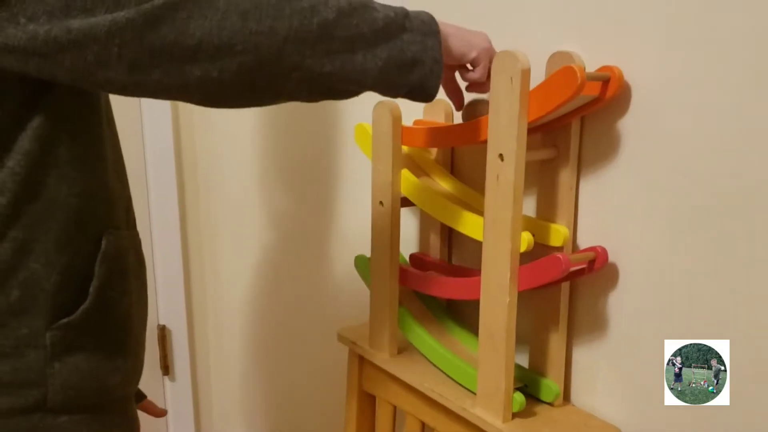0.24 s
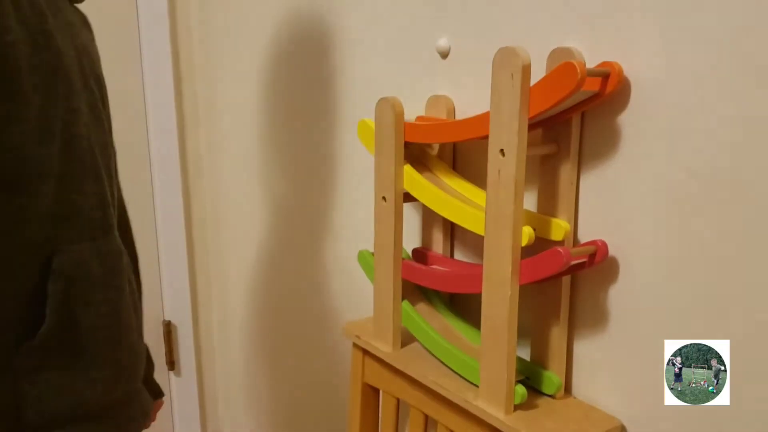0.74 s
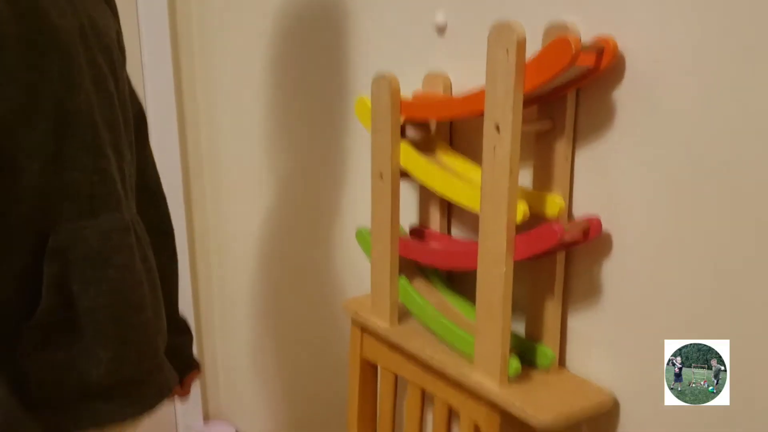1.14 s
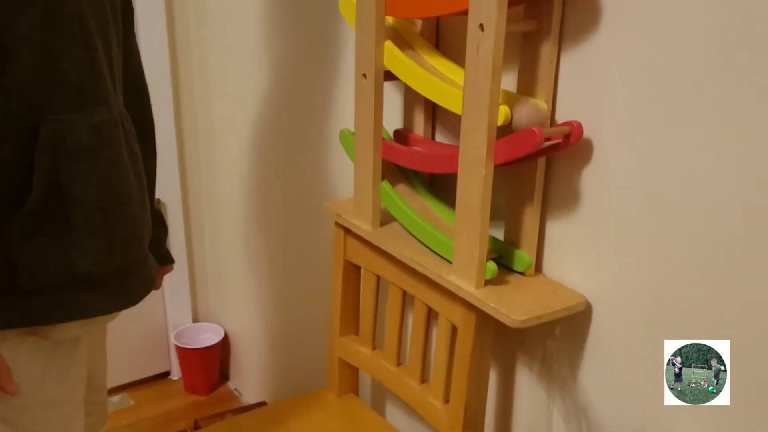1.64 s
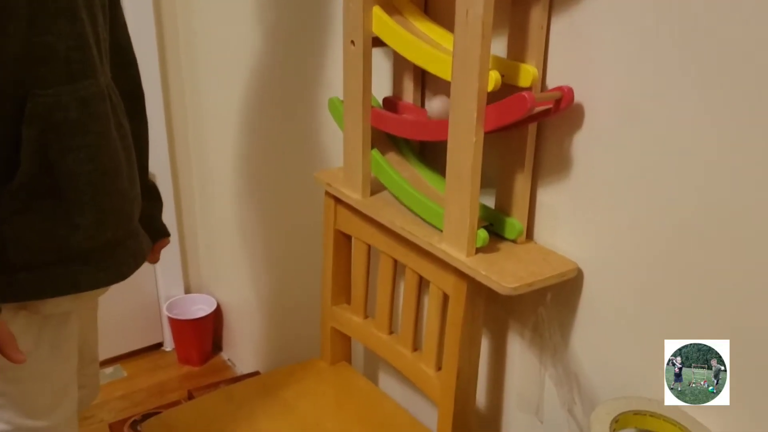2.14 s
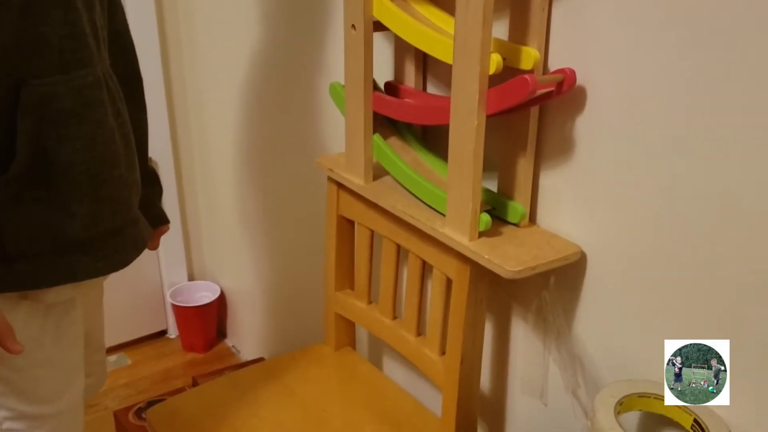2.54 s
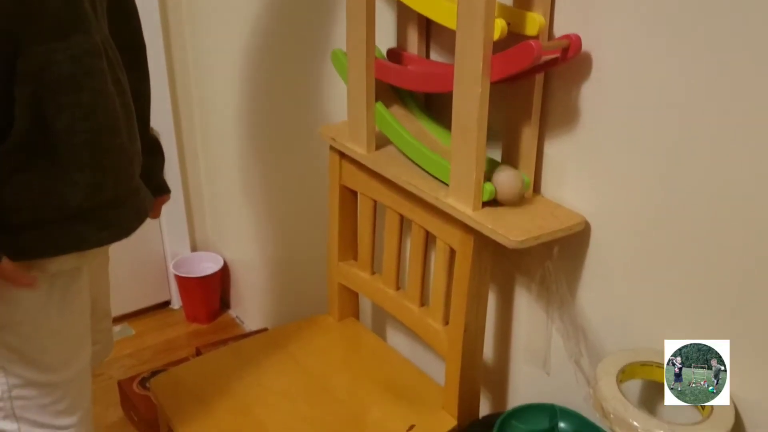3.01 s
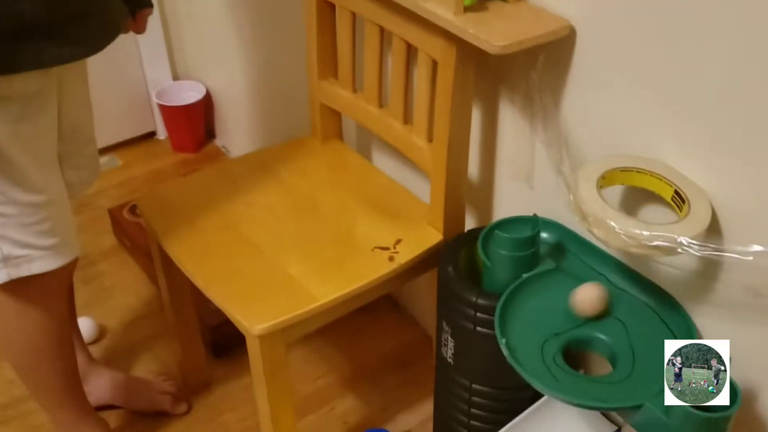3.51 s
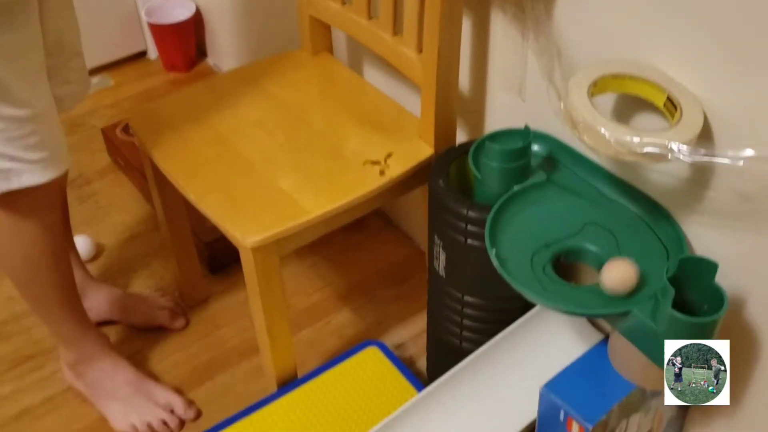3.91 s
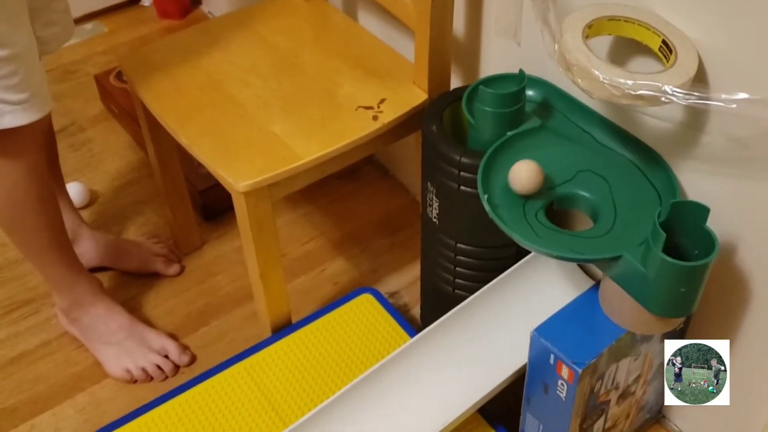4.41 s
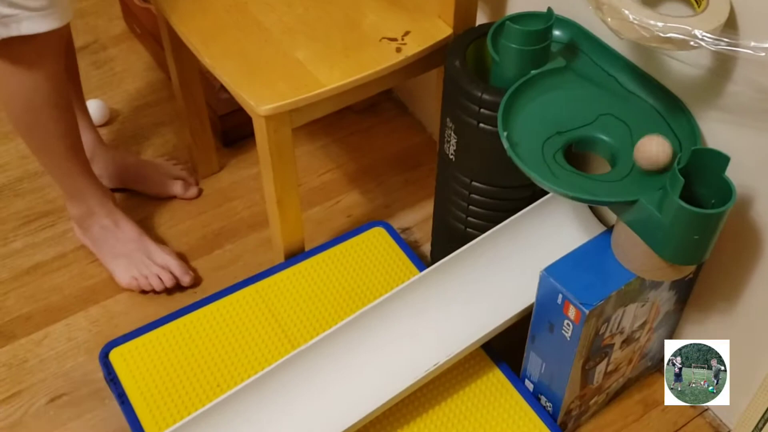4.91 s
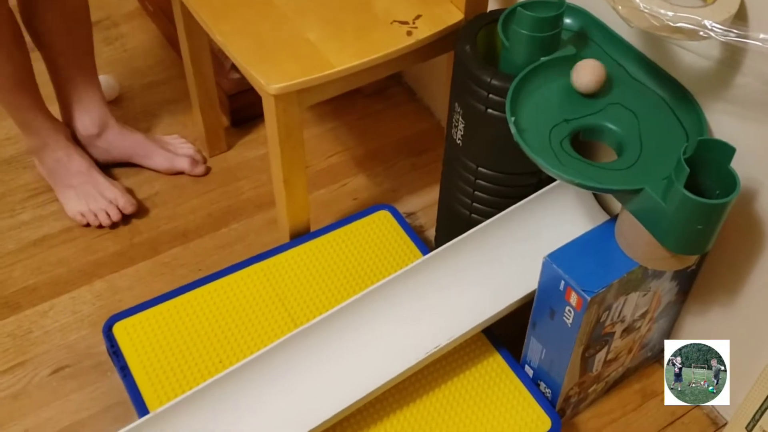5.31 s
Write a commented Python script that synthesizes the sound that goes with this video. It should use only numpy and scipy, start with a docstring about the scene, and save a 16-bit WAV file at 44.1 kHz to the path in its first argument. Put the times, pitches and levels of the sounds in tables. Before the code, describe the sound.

A wooden ball clatters down a wooden ramp toy, then lands in a plastic funnel and circles with a hollow, fading rumble.

```python
"""A wooden ball is set on a wooden zigzag ramp toy in a small, quiet room. It drops down four ramps,
bouncing and rattling on each; on all but the second it then rolls smoothly and gathers speed. Each knock
rings the ramp and the frame. At about 3 s it hits the end stop, glances off a roll of tape and lands in a
plastic marble-run funnel. There it circles with a hollow, fading rumble that swells at each pass near
the hole. Just before 5 s something soft brushes faintly in the room."""
import sys
import numpy as np
from scipy import signal
from scipy.fft import rfft, irfft
from scipy.io import wavfile

SR = 44100
rng = np.random.default_rng(int(sys.argv[2]) if len(sys.argv) > 2 else 0)


def to_wav(sig):
    """Store sig (one row per channel, or 1-D mono) as 16-bit WAV at the path in sys.argv[1].

    Samples outside -1..1 are clipped; the rate is SR.
    """
    pcm = np.clip(np.atleast_2d(sig), -1, 1) * 32767
    pcm = np.round(pcm).astype(np.int16)
    wavfile.write(sys.argv[1], SR, pcm.T)  # frames by channels


N = 245131
TIME = np.arange(N) / SR
RING_SAMPLES = 22050
AGE = np.arange(RING_SAMPLES) / SR  # seconds since an impact
FILTER_HZ, SCENE_HZ = np.fft.rfftfreq(2 * RING_SAMPLES, 1 / SR), np.fft.rfftfreq(N, 1 / SR)

# low modes of the toy's upright frame and the funnel's dish: pitch_hz, level_db, t60_s
FRAME_MODES = [(102, -5.5, 0.17), (140.9, 0.5, 0.28), (245.5, 1.5, .25), (267.1, -9.5, 0.34),
               (330.6, -6.5, 0.26), (540, 1.5, 0.18)]
DISH_MODES = [(205.5, 7.5, 0.11), (215.3, -5, 0.41), (282, -8.5, 0.15), (305, -9, 0.27), (371.4, 6, 0.15),
              (403.6, -5, 0.094), (526, -2, 0.16)]
# decay of toy and room together: frequency_hz, t60_s
DECAY = [(100, 0.35), (260, 0.29), (700, 0.28), (1840, 0.26), (4850, 0.26), (12800, 0.24)]
# likeness of left and right: frequency_hz, correlation
STEREO_LIKENESS = [(130, 0.93), (260, 0.98), (520, 0.69), (1000, 0.32), (4000, 0.033), (12000, 0.44)]


def struck_parts():
    """The parts that the ball strikes on its way down, each with a dull body and a clear ring."""
    # dense, quickly dying vibration: frequency_hz, level_db
    ramp1_body = [(29, -48), (50, -25.5), (135, -8), (198, -27), (246, 1.5), (461, -19.5), (532, -6),
                  (802, -17.5), (1070, -4), (1300, -7.5), (2440, -7.5), (2880, -11), (16000, -35)]
    ramp2_body = [(29, -20.5), (50, -13), (138, -3), (189, -8), (258, -5), (291, -9), (520, -4.5),
                  (615, -10), (950, -1), (1300, -6.5), (2440, 0.5), (2950, -4.5), (3500, -2.5), (5670, -14),
                  (16000, -32.5)]
    ramp3_body = [(29, -38), (50, -16), (101, 3.5), (180, -11), (240, -1.5), (321, -4), (389, -12),
                  (532, -3.5), (601, -9), (1100, -1), (1620, -3.5), (2110, -0.5), (2320, -1), (2810, 0.5),
                  (16000, -25.5)]
    ramp4_body = [(29, -50.5), (50, -17), (138, -10), (189, -12), (246, -14.5), (461, -11.5), (545, -12.5),
                  (615, -14), (927, -0.5), (2210, -13), (3180, -9), (3670, -15), (7390, -25), (8750, -28),
                  (16000, -42.5)]
    stop_body = [(29, -56), (50, -25), (141, -11), (184, -24.5), (252, -15), (291, -15.5), (398, -6),
                 (586, -26.5), (822, -8.5), (1540, -9.5), (2320, -2.5), (2750, -14.5), (4040, -14.5),
                 (4560, -23.5), (16000, -59.5)]
    tape_body = [(29, -75), (50, -29.5), (119, 2), (171, -6), (218, -35), (291, -17), (520, -10),
                 (997, -23), (2880, -35), (6870, -44.5), (16000, -50)]
    funnel_body = [(29, -23), (50, -13), (87, -3.5), (141, -10), (193, -13), (321, -4), (418, 4),
                   (495, -14.5), (601, -4), (1700, -6), (3580, -14), (6710, -18.5), (16000, -31.5)]
    # clear modes: pitch_hz, level_db, t60_s
    ramp1_modes = [(1020, 5, 0.22), (1420, 3, 0.088), (1814, 4, 0.3), (2400, -10.5, 0.068),
                   (3500, -22, 0.26)]
    ramp2_modes = [(955, -3.5, 0.37), (1675, -5.5, 0.54), (2000, -19.5, .2), (2320, -5.5, .22),
                   (2440, -6, 0.29), (3287, 0, 0.14), (3350, -4.5, .16), (3180, -3, .16),
                   (3420, -0.5, 0.062), (4150, -9.5, .15), (5670, -16, 0.14)]
    ramp3_modes = [(335.6, -1, .18), (714, -7, 0.24), (1057, -6, 0.089), (1090, -3.5, 0.31),
                   (1424, 4, 0.25), (1733, -0.5, .14), (1970, 14, .16), (2320, -5.5, 0.14), (2590, 0, .17),
                   (2900, 2, 0.19), (2901, -3.5, 0.12), (3000, -5.5, 0.26), (3755, -2, 0.062),
                   (4114, -15.5, .15)]
    ramp4_modes = [(909, 3.5, 0.21), (1086, -1, 0.18), (1210, -8.5, 0.16), (1260, -4.5, 0.08),
                   (1450, -7.5, 0.42), (1840, -5, 0.16), (1870, -11.5, 0.07), (2385, -10.5, 0.094),
                   (3230, -7.5, 0.11)]
    stop_modes = [(399, -18.5, 0.21), (1457, -11, 0.13), (2210, 0, 0.091), (2330, 3, 0.14),
                  (2421, 1.5, 0.15), (4080, -13.5, 0.23)]
    tape_modes = [(129, 1.5, 0.61), (218.6, -0.5, 0.38), (262, -3, 0.25), (341.6, -1.5, 0.36),
                  (388, -6, 0.32), (550, -4, 0.14)]
    funnel_modes = [(412, 14, 0.13), (576, 1, 0.21), (857, 10.5, 0.18), (1206, 2, 0.29), (1737, 1, 0.22),
                    (1878, -0.5, 0.24), (2630, -20, 0.19), (2830, 2, 0.21), (2840, -11, 0.13),
                    (3170, 4, 0.14), (3940, -17, 0.17), (4400, -3, 0.16)]
    # start_s, body, clear modes, low modes, thump_db
    return [(0, ramp1_body, ramp1_modes, FRAME_MODES, 0.5),
            (.7, ramp2_body, ramp2_modes, FRAME_MODES, 3),
            (1.5, ramp3_body, ramp3_modes, FRAME_MODES, 2.24),
            (2.3, ramp4_body, ramp4_modes, FRAME_MODES, 2.5),
            (3.03, stop_body, stop_modes, FRAME_MODES, 1.5),
            (3.25, tape_body, tape_modes, tape_modes, -6),
            (3.45, funnel_body, funnel_modes, DISH_MODES, -1)]


def knocks(body_db=-1, low_ring_db=-2, body_bass_db=-3, spot_octaves=0.27, thump_per_softness=.1):
    """Each knock sounds the part that the ball has reached; soft ones thump, hard ones snap."""
    # the ball's blows, each favouring a pitch set by the spot it strikes:
    # start_s, level_db, hardness_db, crack_db, ring_db, spot_hz, spot_db
    hits = [(0.301, 7, 2.5, -27.5, -7, 890, 10), (0.353, 5, 2, -18.5, -7, 2400, 4.5),
            (0.7979, 14, 6.5, -6, -5, 7600, 7.5), (0.965, 13, 8, -8.5, -13, 5540, 0),
            (1.053, 9, 2.5, -6.5, -7.5, 5770, 7), (1.1536, 7.5, -1.5, -4.5, -15, 2420, 4),
            (1.225, 5, 3.5, -4, -13, 1740, 10), (1.277, 2, -6, -8, -8.5, 2410, 3.5),
            (1.5559, 13.5, 5, -12, -6.5, 2116, 2), (1.732, 11, 2.5, -9, -8, 6650, 2.5),
            (1.7971, 8.5, 8, -6, -7, 1127, 15.5), (1.86, 13.5, -0.5, -1.5, -12.5, 3190, 9),
            (1.931, -0.5, -0.5, -8, -4.5, 2430, 9), (1.967, 7, -2.5, -16.5, -5.5, 1430, 5),
            (2.027, 2.5, -9, -3, -4, 3770, 6), (2.102, -3.5, -17, -12, -11.5, 690, 8.5),
            (2.158, -5, -18, -4.5, -4.5, 1104, 11), (2.387, -12, -26, -5, -2, 1390, 30),
            (2.4188, -7, -14, -3, -9, 1560, 12.5), (2.4392, 16, 9, -4, -6, 3090, 3),
            (2.572, 11, -4, -3, -7, 2300, 8), (2.613, 6, -2.5, -12, -5.5, 1480, 6),
            (2.64, 3.5, -13, -6, -2, 1193, 12.5), (2.969, -14.5, -22, -14.5, -11, 2240, 15),
            (3.002, -16, -1.5, -12, -10, 4520, 13), (3.06, 13, 7.5, -3.5, 2.5, 3008, 8.5),
            (3.131, 11.5, 1.5, -4, -5, 707, 16), (3.284, -11.5, 6, -20.5, -13, 2110, 5),
            (3.337, -12.5, 9, -13.5, 14, 425, 13.5), (3.4949, 4.5, 6.5, -6, -13, 2320, 4.5),
            (3.5063, 12.5, 2, -10, -8.5, 1820, 8), (3.682, -8, -15, -1.5, -8.5, 771, 17.5),
            (3.7405, -7.5, -2.5, -3, -18, 5190, 10), (3.829, -4, -9, -1, -11.5, 2050, 5)]
    knock_band = (FILTER_HZ > 700) & (FILTER_HZ < 3500)
    thump_band = (FILTER_HZ > 80) & (FILTER_HZ < 400)
    parts, out = struck_parts(), np.zeros((2, N))
    part_rooms = [room() for _ in parts]  # knocks on one part share some of their fine pattern
    for start_s, level_db, hardness_db, crack_db, ring_db, spot_hz, spot_db in hits:
        reached = sum(start_s >= part[0] for part in parts[1:])
        _, body_colour, modes, low_modes, thump_db = parts[reached]
        spot = [(spot_hz / 2 ** spot_octaves, 0), (spot_hz, spot_db), (spot_hz * 2 ** spot_octaves, 0)]
        bass_db = thump_db - thump_per_softness * hardness_db
        contact = [(350, bass_db), (800, 0), (3000, 0), (5500, hardness_db)]
        shape_db = curve(body_colour) + curve(spot) + curve(contact) + grain()
        shape_db -= 10 * np.log10(np.mean(amp(shape_db) ** 2 * knock_band))  # level set by the mids
        thump = np.sqrt(np.mean(amp(shape_db) ** 2 * thump_band))
        reflections = unit(.7 * part_rooms[reached] + room())
        impact = unit(reflections + amp(crack_db) * crack())
        body = amp(body_db) * colour(impact, shape_db + curve([(330, body_bass_db), (600, 0)]))
        clear_ring = amp(ring_db) * ring(modes, rise_s=0.0015, weights=spot)
        low_ring = amp(low_ring_db) * thump * ring(low_modes, rise_s=0.0045)
        add(out, start_s, amp(level_db) * (body + clear_ring + low_ring))
    return out


def crack(contact_s=0.00054, tilt_db=3):
    """The direct sound of contact; the higher the pitch, the more of it arrives this way."""
    burst = unit(stereo_noise(RING_SAMPLES) * AGE * np.exp(-AGE / contact_s))
    return colour(burst, curve([(1000, -tilt_db), (3500, 0), (8000, tilt_db)]))


def ring(modes, rise_s, weights=((0, 0),), scatter_db=2.5):
    """Damped modes, weighted by (frequency_hz, gain_db) points; high ones reach the sides out of step."""
    hz, mode_db, t60_s = np.transpose(modes)[:, :, None]
    strength, phase, side = rng.standard_normal((3, len(modes), 1))
    lag = np.arccos(np.clip(curve(STEREO_LIKENESS, hz), -1, 1)) * np.sign(side)
    waves = np.sin(2 * np.pi * (hz * AGE + phase) + np.array([0 * lag, lag]))
    lasts_s = np.minimum(t60_s, curve(DECAY, hz))  # no mode outlasts the toy and room together
    level_db = mode_db + curve(weights, hz) + scatter_db * strength - 60 * AGE / lasts_s
    return unit((amp(level_db) * waves).sum(1) * (1 - np.exp(-AGE / rise_s)))


def grain(depth_db=2.6, spacing_hz=130):
    """Peaks and valleys, in dB, of the many short-lived modes that one point of contact excites."""
    knots_hz = np.arange(0, SR / 2, spacing_hz)
    ripple = np.interp(FILTER_HZ, knots_hz, rng.standard_normal(len(knots_hz)))
    return ripple * depth_db * curve([(500, 0), (1500, 1.4), (4000, 1.4), (9000, .6)])


def ramp_roll(rumble_db=-41, grit_db=-35, grit_power=1.84, speedup_db_per_s=11.5):
    """The force of the ball on the wooden rails drives a rumble and, more steeply, a grit."""
    # force on each ramp (on the second the rattle hides the smooth roll):
    # start_s, rattle_end_s, roll_end_s, rattle_db, roll_end_db
    runs = [(.34, 0.448, 0.73, -1.5, -16.5), (1.25, 1.456, 1.4, 0, -14), (2.06, 2.226, 2.42, -1, -11),
            (2.6, 2.696, 3.05, 0.5, -7)]
    # colours of rolling on wood: frequency_hz, level_db
    rumble = [(40, -19.5), (110, -1), (260, -1), (550, -5.5), (900, -16), (2000, -48.5)]
    grit = [(300, -35.5), (800, -1.5), (1150, -0.5), (1500, -2), (1800, -5), (2600, -9), (4200, -16),
            (7500, -32.5), (9000, -41.5), (16000, -48)]
    # higher modes of the rails: pitch_hz, level_db, t60_s
    rail_modes = [(1130, -3, 0.18), (1235, -2.5, .14), (1440, 1, 0.18), (1615, 0.5, 0.048),
                  (2400, -1.5, 0.12), (4400, -1, 0.12)]
    force = np.zeros(N)
    for start_s, rattle_end_s, roll_end_s, rattle_db, roll_end_db in runs:
        rattle = amp(rattle_db) * held(start_s, rattle_end_s)
        speedup = amp(roll_end_db - speedup_db_per_s * np.maximum(roll_end_s - TIME, 0))
        force += np.maximum(rattle, speedup * held(start_s, roll_end_s))
    levels = [amp(rumble_db) * force, amp(grit_db) * force ** grit_power]
    return rolling(levels, [rumble, grit], FRAME_MODES + rail_modes,
                   modes_db=-1.5, jolts_per_s=400, spread_db=5.5, stretch_s=.11)


def funnel_roll(start_s=3.56, near_hole_s=4, swell_period_s=0.51):
    """The slowing ball grows quieter and duller; its oval path speeds it up at each pass near the hole."""
    # one row each for rumble, hollow rasp and grit: start_db, fade_db_per_s, swell_db
    circling = [(-52, 4, 2.2), (-54.5, 17, 0.5), (-66, 13, 7)]
    # bumps under the ball: centre_s, half_length_s, rumble_db, rasp_db, grit_db
    bumps = [(3.781, 0.011, -56, -51, -45.5), (4.001, .005, -48, -43, -54), (4.043, .012, -55, -56, -55),
             (4.138, 0.015, -51, -43.5, -70), (4.192, 0.0099, -42.5, -48.5, -84),
             (4.319, .016, -46.5, -54.5, -61), (4.478, 0.011, -48, -53.5, -52.5),
             (4.679, .018, -51, -63, -83), (4.868, 0.022, -55, -54.5, -85), (5.06, .018, -52, -62, -65),
             (5.268, .02, -52.5, -81.5, -89), (5.503, .018, -58, -63.5, -68)]
    # colours of rolling on plastic: frequency_hz, level_db
    rumble = [(40, -16), (120, -8), (210, 12), (400, 12), (520, 3), (800, -9), (1500, -63)]
    rasp = [(300, -37), (600, 3), (880, 2), (1250, -1.5), (1600, -14), (2500, -48)]
    grit = [(900, -17), (1600, 15.5), (2300, 6.5), (3200, -3), (5000, -28), (16000, -40)]
    # higher modes of the dish: pitch_hz, level_db, t60_s
    rim_modes = [(710, -16, 0.06), (820, 7, 0.092), (892, 4, 0.14), (1213, -2.5, 0.087),
                 (1370, -1.5, 0.095), (1885, -6, 0.034), (2320, -3, 0.046)]
    start_db, fade_db_per_s, swell_db = np.transpose(circling)[:, :, None]
    nearness = np.cos(2 * np.pi * (TIME - near_hole_s) / swell_period_s)  # a swell about every half lap
    levels = amp(start_db - fade_db_per_s * (TIME - start_s) + swell_db * nearness) * (TIME > start_s)
    for centre_s, half_length_s, *bump_db in bumps:
        bump = np.exp(-((TIME - centre_s) / half_length_s) ** 2 / 2)
        levels = np.maximum(levels, amp(bump_db)[:, None] * bump)
    return rolling(levels, [rumble, rasp, grit], DISH_MODES + rim_modes,
                   modes_db=1, jolts_per_s=600, spread_db=1, stretch_s=.09)


def rolling(levels, colours, modes, modes_db, jolts_per_s, spread_db, stretch_s, variants=4):
    """Jolts shake the track in several colours; its resonances shift from one stretch to the next."""
    stretch = (TIME // stretch_s) % variants
    out = np.zeros((2, N))
    for level, tone in zip(levels, colours):
        clicks = jolts(level, jolts_per_s, spread_db)
        for variant in range(variants):
            body = unit(colour(room(), curve(tone) + grain()))
            # the ball's weight detunes the modes differently at each place
            detuned = np.array(modes) * [1 + .04 * rng.uniform(-1, 1), 1, 1]
            ringing = amp(modes_db) * ring(detuned, rise_s=0.0035, weights=tone, scatter_db=3.5)
            out += signal.oaconvolve(clicks * (stretch == variant), unit(body + ringing), axes=1)[:, :N]
    return out


def jolts(level, per_s, spread_db):
    """Tiny random impacts of something moving over an uneven surface."""
    clicks = (rng.random(N) < per_s / SR) * rng.choice([-1, 1], N)
    clicks = clicks * amp(spread_db * np.minimum(rng.exponential(1, N), 3))
    return (clicks / clicks.std() * level)[None]


def brush(start_s=4.9, end_s=4.995, end_db=-73.5):
    """Something soft brushes lightly: a fine hiss of tiny contacts that swells and stops."""
    # colour of the brushing: frequency_hz, level_db
    hiss = [(1000, -20), (3000, -6), (6500, -4), (8500, -6.5), (16000, -15)]
    swell = amp(end_db) * np.clip((TIME - start_s) / (end_s - start_s), 0, 1) * (TIME < end_s)
    response = unit(colour(room(), curve(hiss)))
    return signal.oaconvolve(jolts(swell, per_s=2000, spread_db=3), response, axes=1)[:, :N]


def room(early_db=-8, wall_s=.0085, early_decay_s=0.0019, bass_rise_s=0.0016):
    """The room's response: a cluster of reflections off the near wall, and a diffuse tail."""
    hz, t, spectrum = signal.stft(stereo_noise(RING_SAMPLES), SR, nperseg=256)
    rise_s = bass_rise_s * np.sqrt(300 / (hz[:, None] + 100))  # the bass builds up last
    rise = 1 - np.exp(-(t + 0.0013) / rise_s)
    decay = amp(-60 * t / curve(DECAY, hz)[:, None])
    tail = signal.istft(spectrum * rise * decay, SR, nperseg=256)[1][:, :RING_SAMPLES]
    early = stereo_noise(RING_SAMPLES) * (AGE > wall_s) * np.exp(-abs(AGE - wall_s) / early_decay_s)
    return unit(unit(tail) + amp(early_db) * unit(early))


def room_tone(level_db=-61):
    """Steady low murmur and faint hiss of the room."""
    # colour of the quiet room: frequency_hz, level_db
    murmur = [(25, -4), (70, 6.5), (160, -1), (490, -2), (890, -20.5), (1650, -27.5), (4600, -32.5),
              (9000, -37), (15500, -36.5)]
    noise = irfft(rfft(stereo_noise(N)) * amp(curve(murmur, SCENE_HZ)), N)
    return amp(level_db) * noise / noise.std()


def stereo_noise(count):
    """White noise, nearly mono in the bass and wide in the treble."""
    left, other = rfft(rng.standard_normal((2, count)))
    likeness = np.clip(curve(STEREO_LIKENESS, np.fft.rfftfreq(count, 1 / SR)), -1, 1)
    right = likeness * left + np.sqrt(1 - likeness ** 2) * other
    return irfft(np.array([left, right]), count)


def held(start_s, end_s, rise_s=0.054, settle_s=0.01):
    """Envelope of a stretch of rolling: rise, hold, die away."""
    return np.clip((TIME - start_s) / rise_s, 0, 1) * np.exp(-np.maximum(TIME - end_s, 0) / settle_s)


def colour(sound, gain_db):
    """Minimum-phase EQ, with gains on FILTER_HZ: nothing rings ahead of the attack."""
    cepstrum = irfft(np.log(amp(gain_db)))
    cepstrum[1:RING_SAMPLES] *= 2
    cepstrum[RING_SAMPLES + 1:] = 0
    return irfft(rfft(sound, 2 * RING_SAMPLES) * np.exp(rfft(cepstrum)))[:, :RING_SAMPLES]


def curve(points, hz=FILTER_HZ):
    """A table's value along a logarithmic frequency axis."""
    knots_hz, values = np.transpose(points)
    return np.interp(np.log(hz + 1), np.log(knots_hz + 1), values)


def amp(db):
    """Decibels to gain."""
    return 10 ** (np.asarray(db) / 20)


def unit(sound):
    """Scales a sound to an average energy of 1 per channel."""
    return sound / np.sqrt((sound ** 2).sum(-1).mean() + 1e-20)


def add(mix, start_s, sound):
    """Mixes a stereo sound in at a time."""
    span = mix[:, round(start_s * SR):][:, :sound.shape[1]]
    span += sound[:, :span.shape[1]]


def scene():
    """Knocks and rolling, both a little left of centre, over the quiet room and the faint brush."""
    knocking = knocks() * amp([[.47], [-.47]])
    rolls = (ramp_roll() + funnel_roll()) * amp([[.7], [-.7]])
    return knocking + rolls + room_tone() + brush()


def record(dry, ceiling=.92, cutoff_hz=16100):
    """The microphone's colour, a soft ceiling on the sharpest peaks, then a low-pass."""
    # treble colour: frequency_hz, gain_db
    treble = [(5500, 0), (7500, 2), (8400, -5.5), (11000, -0.5), (15500, 0)]
    coloured = irfft(rfft(dry) * amp(curve(treble, SCENE_HZ)), N)
    limited = coloured / (1 + (coloured / ceiling) ** 8) ** (1 / 8)
    low_pass = signal.firwin(301, cutoff_hz, window=("kaiser", 9), fs=SR)
    return signal.oaconvolve(limited, low_pass[None], "same")


dry = scene()
out = record(dry)
to_wav(out)
```